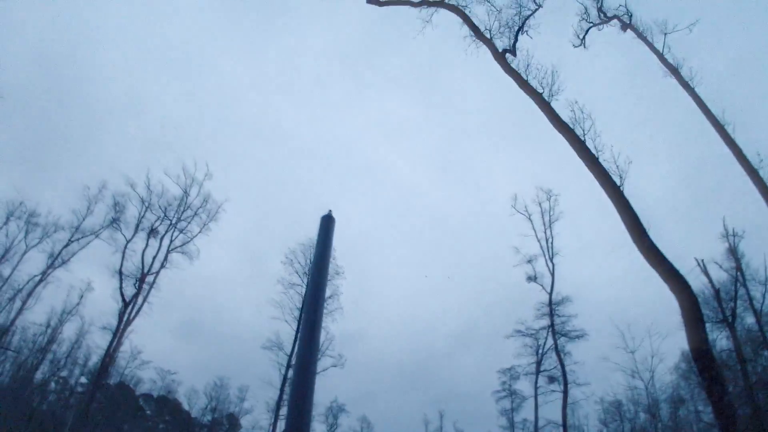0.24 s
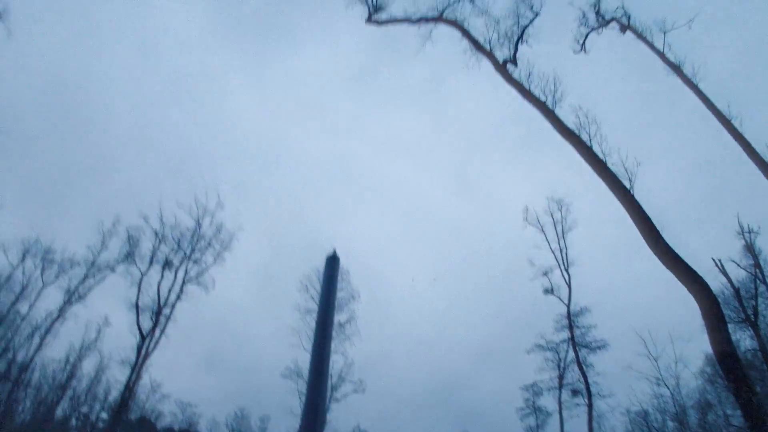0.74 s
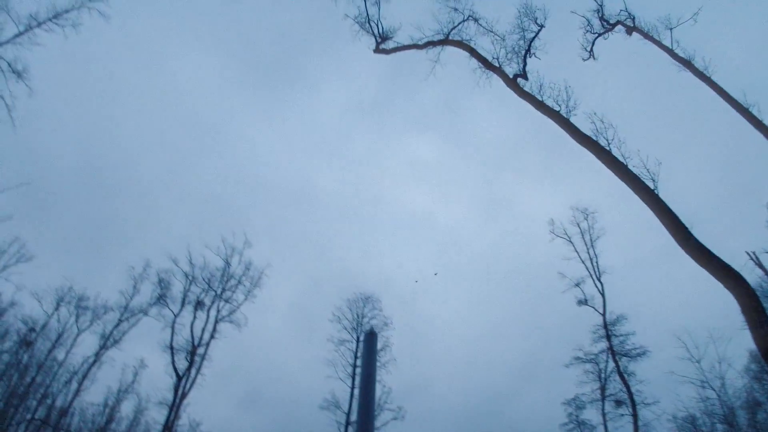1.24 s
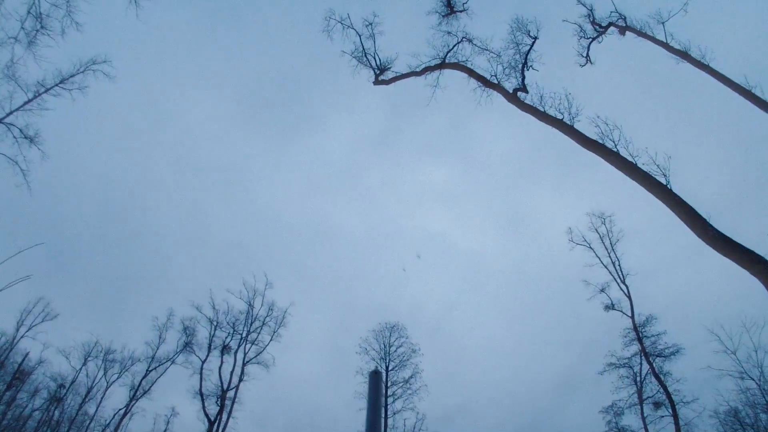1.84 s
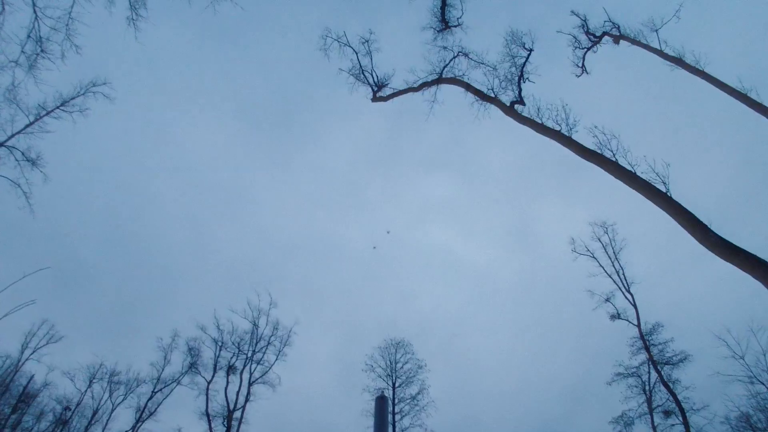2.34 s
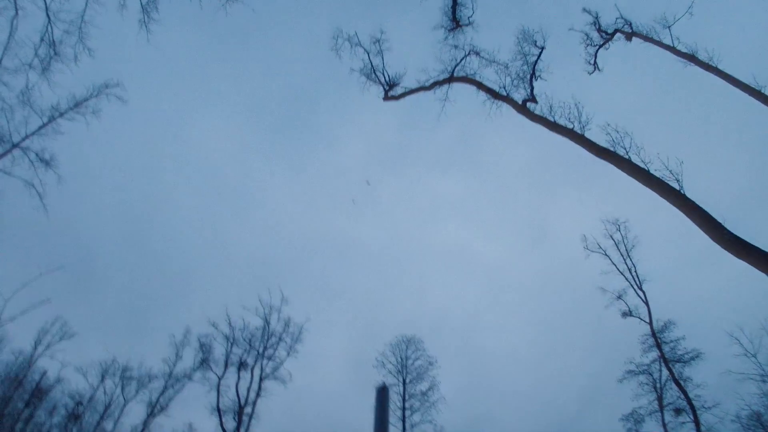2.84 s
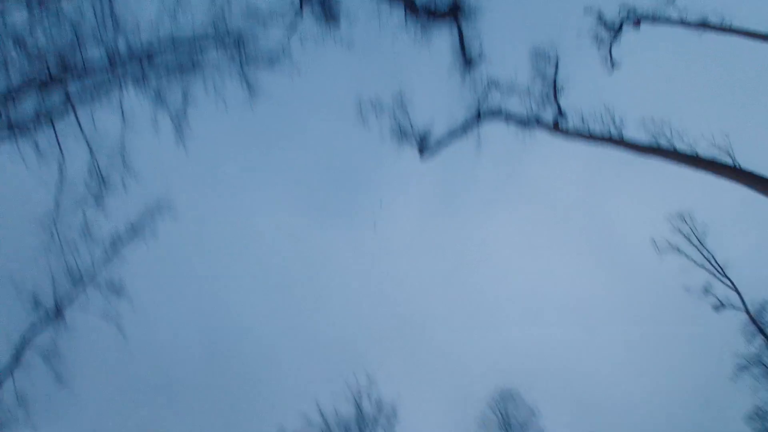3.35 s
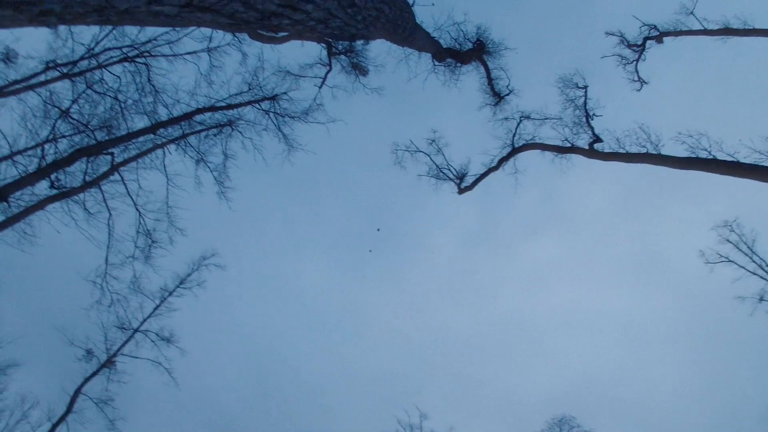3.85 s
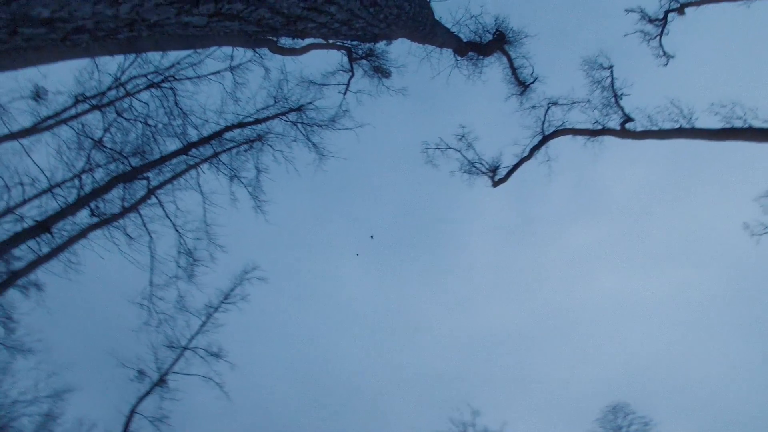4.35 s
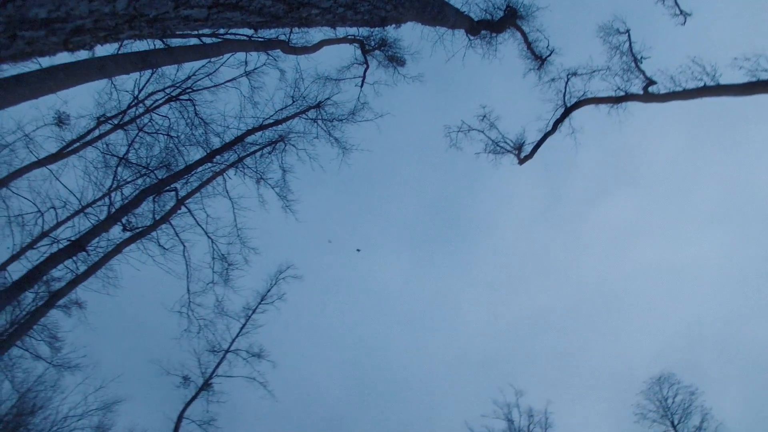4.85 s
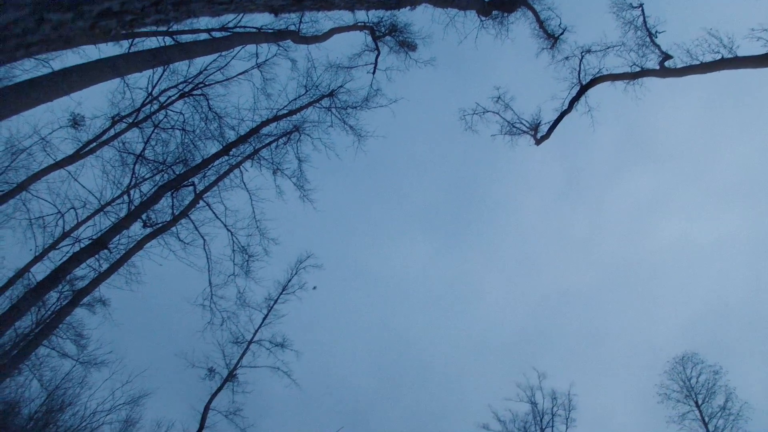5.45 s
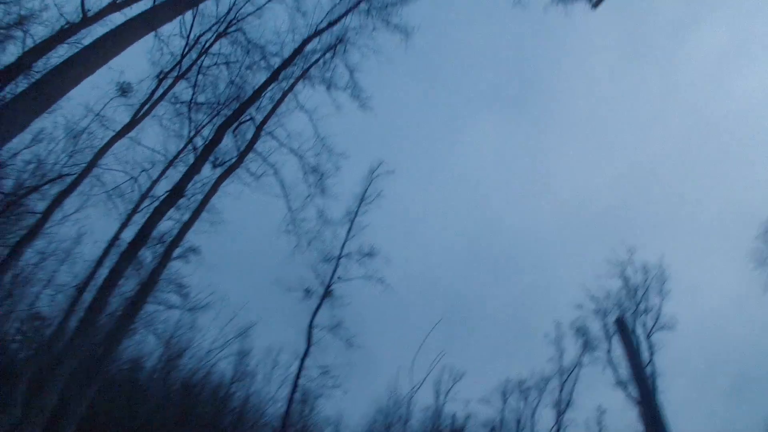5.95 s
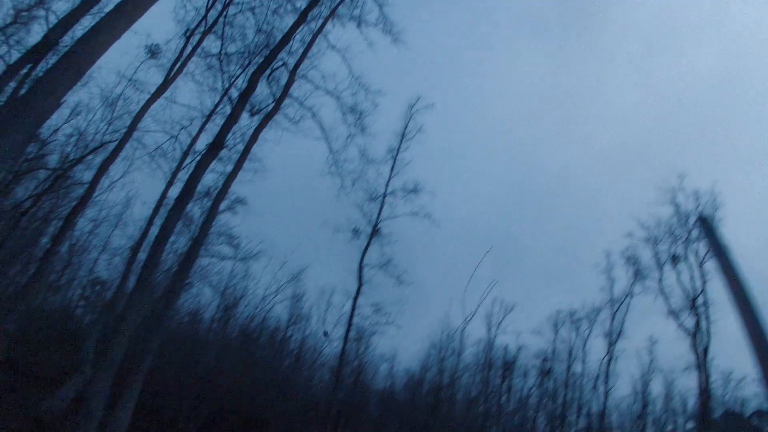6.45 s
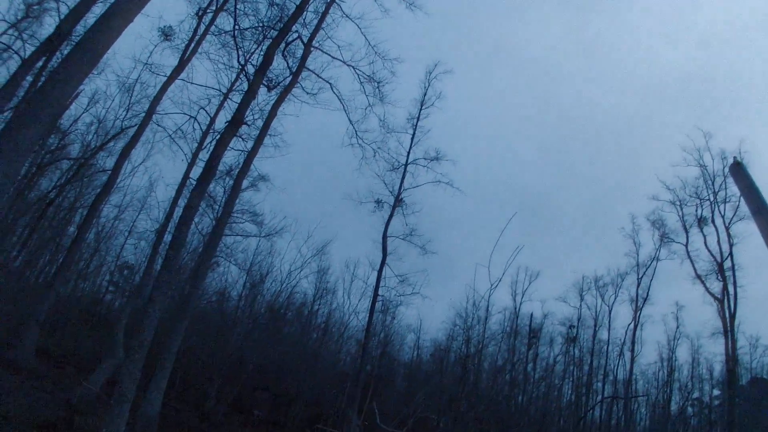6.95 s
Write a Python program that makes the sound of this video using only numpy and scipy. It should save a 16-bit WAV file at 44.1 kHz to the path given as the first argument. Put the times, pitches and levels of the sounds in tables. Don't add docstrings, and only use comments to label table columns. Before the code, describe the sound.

Low wind and distant traffic hum under tiny gun ticks and one high bird chip. Suddenly a very close gunshot clips the microphone, followed at once by dense woodland echoes, pulsing low booms and a darkening tail lasting a few seconds. A few hard little bits land. Finally come dull knocks on the wooden stock, sliding scrapes and two strong metal clacks as the action is worked, dry and near.

```python
import sys
import numpy as np
from scipy import signal
from scipy.fft import rfft, irfft, next_fast_len
from scipy.io import wavfile
from scipy.ndimage import uniform_filter1d, map_coordinates

SR = 44100
rng = np.random.default_rng(int(sys.argv[2]) if len(sys.argv) > 2 else 0)


def invert_db(x):
    u = np.asarray(x, float) / 20
    return 10 ** u


def digitize_waveform(pressure):
    field = np.atleast_2d(pressure).T
    bounded = np.clip(field, -1, 1)
    quanta = np.round(bounded * 32767).astype(np.int16)
    wavfile.write(sys.argv[1], SR, quanta)


N = 317520
SHOT_S = 2.8988


def unit(x):
    return x / np.sqrt(np.mean(x ** 2) + 1e-20)


def along(points, hz):
    f, v = np.transpose(points)
    return np.interp(np.log(hz + 1), np.log(f + 1), v)


def curves(rows, outside=None):
    s, *columns = np.transpose(rows)
    return [np.interp(np.arange(N) / SR, s, column, outside, outside) for column in columns]


def wobble(rate):
    knots = rng.standard_normal(int(N * rate / SR) + 4)
    return map_coordinates(knots, [np.arange(N) * rate / SR])


def filtered(x, response):
    m = next_fast_len(N + SR // 2)
    return irfft(rfft(x, m) * response(np.fft.rfftfreq(m, 1 / SR)), m)[..., :N]


def resonances(modes):
    def response(f):
        total = 0
        for k, (centre, width, db) in enumerate(modes):
            total = total + (-1) ** k * invert_db(db) * 1j * f * width / (centre * centre - f * f + 1j * f * width)
        return total
    return response


def rush(spectrum, source=None):
    noise = rng.standard_normal(N) if source is None else source
    return unit(filtered(noise, lambda hz: invert_db(along(spectrum, hz))))


def background():
    # (time [s], level [dB])
    wind = [(0, -37.5), (.55, -41), (1.2, -39.5), (2.35, -41), (2.85, -39.5), (5.3, -39.5), (6, -41.5),
            (6.35, -37.5), (6.75, -40.5), (7.2, -40)]
    # (frequency [Hz], level [dB per Hz])
    rumble = [(12, -37.5), (20, 3.5), (69, 1.5), (140, -5.5), (188, -11), (297, -18), (330, -42),
              (430, -50.5), (730, -120)]
    # (frequency [Hz], level [dB per Hz])
    traffic = [(190, -17), (330, -5), (404, -6), (511, -7), (580, -7), (848, -4.5), (1040, -11),
               (1500, -25), (1950, -55), (3300, -120)]
    # (frequency [Hz], level [dB per Hz])
    hiss_colour = [(760, -11), (1300, -10), (1670, 0.5), (1920, -1), (2250, -4), (2910, -1.5), (3430, -4),
                   (3880, -4.5), (4390, -5.5), (5510, -4.5), (7510, -8.5), (11200, -10.5), (15000, -9.5),
                   (15500, -38.5)]
    # (time [s], firing rate [Hz], 2nd order [dB], 3rd order [dB])
    engine_course = [(0, 88.9, -46, -53), (.6, 89.58, -48, -68.5), (1, 89.2, -51, -57), (1.5, 93, -48, -72),
                     (1.85, 94.1, -50, -55.5), (2.1, 98.1, -53, -52.5), (2.8, 97.64, -40.5, -53),
                     (5, 92.57, -47.5, -69.5), (5.6, 93.15, -43.5, -53.5), (6.2, 93.44, -55, -56),
                     (6.7, 95.6, -51.5, -49), (7.2, 97, -60, -51)]
    # (frequency [Hz], level [dB])
    whine_tones = [(13124, -93.5), (13157, -90.5), (13517, -89)]

    wind_db, = curves(wind)
    firing, second_db, third_db = curves(engine_course)
    turn = 2 * np.pi * np.cumsum(firing * (1 + .005 * wobble(5))) / SR
    engine = invert_db(second_db + 2.2 * wobble(6)) * np.sin(2 * turn)
    engine += invert_db(third_db + 2 * wobble(5)) * np.sin(3 * turn)
    low = invert_db(wind_db + 1.2659 + 1.2 * wobble(7.3)) * rush(rumble)
    road = invert_db(-50.5 + 0.31 * wobble(9.3)) * rush(traffic)
    whine = np.zeros(N)
    for hz, db in whine_tones:
        whine += invert_db(db + 2.0 + 2.5 * wobble(9.6)) * np.sin(2 * np.pi * hz * np.arange(N) / SR)
    hiss = invert_db(-60.5 + .4 * wobble(3.7)) * rush(hiss_colour)
    return low + road + engine + whine + hiss


def chatter(length, t):
    spikes = rng.standard_normal(len(t)) * invert_db(6 * rng.standard_normal(len(t)))
    spikes /= np.std(spikes[:round(length * SR)])
    spikes[0] = 8
    return spikes * invert_db(-5 * t / length - 60 * np.clip(t - length, 0, None) / 0.0103)


def handling():
    # (time [s], peak [dB], bolt over receiver [dB])
    ticks = [(0.456, -44, -5.5), (0.478, -49.5, 16), (0.5294, -52.5, -1.5), (1.3844, -52, -7.5),
             (2.025, -48, -9.5), (2.373, -51.5, 9), (5.162, -43.5, -2.5), (5.716, -46, 1.5),
             (5.737, -39.5, -3), (5.8631, -43, -3.5), (6.034, -40.5, 2), (6.186, -37, -3),
             (6.812, -33.5, -0.5), (6.9394, -36.5, -1), (6.9996, -29.5, 0), (7.0547, -47.5, 4.5)]
    # (time [s], peak [dB], bolt over receiver [dB], small parts [dB])
    action = [(6.3756, -33.5, 5, -22), (6.384, -34.5, -14.5, -18.5), (6.408, -39, -0.5, -12),
              (6.432, -40.5, -0.5, -5), (6.447, -38.5, -8.5, -3.5), (6.4572, -28.5, 4, -14),
              (6.461, -19.5, 0.5, -8.5), (6.481, -35.5, 9.5, 8.5), (6.521, -32.5, 8.5, -7.5),
              (6.535, -36.5, 5.5, -6), (6.554, -15.5, 3, -13), (6.617, -24.5, 7.5, -5.5),
              (6.624, -13, -1.5, -10.5), (6.6418, -17.5, 13.5, 6.5), (6.719, -28, -1, -13)]
    # (time [s], peak [dB], pitch [Hz], length [s])
    knocks = [(0.13, -41.5, 830, 0.0055), (5.826, -30, 648, 0.0166), (5.878, -33, 513, 0.0072),
              (5.997, -36.5, 509, 0.0101), (6.03, -35, 778, 0.0073), (6.39, -24.5, 787, 0.0088),
              (6.412, -30.5, 828, 0.0076), (6.44, -29.5, 294, 0.0103), (6.46, -14.5, 285, 0.00309),
              (6.52, -29.5, 611, 0.0048), (6.5553, -26.5, 899, 0.0053), (6.615, -23, 425, 0.0112),
              (6.624, -16.5, 767, 0.00386)]
    # (frequency [Hz], width [Hz], level [dB])
    body = [(1675, 266, 4.5), (2483, 480, -1)]
    # (frequency [Hz], width [Hz], level [dB])
    steel = [(3030, 740, 2), (4050, 150, 6), (5330, 896, 2.5), (6900, 220, -12)]
    # (frequency [Hz], width [Hz], level [dB])
    sizzle = [(7570, 11000, -1), (12150, 3900, 3)]
    # (time [s], level [dB])
    slides = [
        [(0.42, -70.5), (0.47, -59), (0.51, -63.5), (0.555, -65), (0.66, -69.5)],
        [(5.7, -73.5), (5.95, -64)],
        [(6.375, -45.5), (6.427, -46.5), (6.551, -50.5), (6.635, -43), (6.743, -48), (7.047, -58.5), (7.2, -62)],
    ]
    # (frequency [Hz], level [dB per Hz])
    scrape = [(150, -26.5), (250, -1), (600, -3.5), (900, -1.5), (1250, -8.5), (1750, -8), (2100, -16.5),
              (2850, -8.5), (3600, -13), (4600, -16.5), (5300, -11.5), (6100, -18.5), (12200, -34),
              (15800, -47)]

    metal = np.zeros((3, N + SR))
    wood = np.zeros(N + SR)
    t = np.arange(SR // 10) / SR
    tick_small_db, parts_db, contact_s = -7, -10.5, 0.00508
    for s, db, lean_db, small_db in [(*row, tick_small_db) for row in ticks] + action:
        share = invert_db(db + parts_db + np.array([-lean_db / 2, lean_db / 2, small_db]))
        metal[:, round(s * SR):][:, :len(t)] += share[:, None] * chatter(contact_s, t)

    for s, db, hz, length in knocks:
        shape = invert_db(-60 * np.clip(t - length, 0, None) / 0.011) * (1 - np.exp(-t / 0.00099))
        ring = np.sin(2 * np.pi * hz * t) * shape
        thud = signal.lfilter(*signal.butter(3, [280, 900], "band", fs=SR), chatter(length, t))
        wood[round(s * SR):][:len(t)] += invert_db(db - 5.5) * (ring + 3.0 * thud)

    def band(f, low_hz, high_hz):
        return 1 / (1 + (f / high_hz) ** 6) / (1 + (low_hz / (f + 1)) ** 6)

    def parts(f):
        return np.array([invert_db(11.5) * resonances(body)(f) * band(f, 990, 3090),
                         invert_db(5.5) * resonances(steel)(f) * band(f, 1770, 8750),
                         invert_db(-5.0) * resonances(sizzle)(f) * band(f, 5800, 15100)])

    near = filtered(metal[:, :N], parts).sum(axis=0) + wood[:N]
    slide = sum(invert_db(curves(rows, outside=-130)[0]) for rows in slides)
    grit = rng.standard_normal(N) * invert_db(2.6 * wobble(300) + .7 * wobble(40))
    t = np.arange(SR // 2) / SR
    tail = unit(rng.standard_normal(len(t)) * invert_db(-60 * t / .5)) / np.sqrt(len(t))
    echo = invert_db(-7.0) * signal.fftconvolve(near, tail)[:N]
    return near + echo + slide * invert_db(6.5) * rush(scrape, source=grit)


def bird():
    # (time [s], length [s], start pitch [Hz], end pitch [Hz], level [dB])
    chips = [
        (1.635, 0.0204, 5600, 7670, -44),
        (5.02, .03, 7300, 7700, -61.5),
        (5.311, 0.0366, 7370, 8000, -57),
    ]
    out = np.zeros(N)
    for s, length, low_hz, high_hz, db in chips:
        u = np.arange(round(length * SR)) / (length * SR)
        pitch = high_hz - (high_hz - low_hz) * np.exp(-3.5 * u)
        loudness = invert_db(db - 9.9 * u) * np.sin(np.pi * u) ** .5
        out[round(s * SR):][:len(u)] += loudness * np.sin(2 * np.pi * np.cumsum(pitch) / SR)
    t = np.arange(SR // 8) / SR
    tail = unit(rng.standard_normal(len(t)) * invert_db(-60 * t / 0.39)) / np.sqrt(len(t))
    return out + invert_db(-5.5) * signal.fftconvolve(out, tail)[:N]


def blast():
    # (delay after the shot [s], level [dB], length of the push [s])
    fronts = [
        (0, 27, .00122),
        (.0021, 26, .00085),
        (.0043, 12, .00025),
    ]
    t = np.arange(N) / SR - SHOT_S
    wave = np.zeros(N)
    for delay, db, phase in fronts:
        u = np.clip(t - delay, 0, None) / phase
        wave -= invert_db(db) * (t >= delay) * (1 - u) * np.exp(-1.15 * u)
    wave *= invert_db(-60 * np.clip(t - .0042, 0, None) / .004)
    pressure = filtered(wave, lambda f: 1 / (1 + 1j * f / 8000))

    lead = np.clip(1 + t / .0022, 0, 1) ** 2
    swell = np.where(t < .0045, lead, invert_db(-60 * (t - .0045) / .02))
    swell *= np.where(t > .004, 2, 1)
    mount = resonances([(4800, 1200, 0), (2800, 1200, -5)])
    rattle = invert_db(-7) * swell * unit(filtered(rng.standard_normal(N), lambda f: mount(f) ** 2))
    early_push = .7 * lead ** 2 * (t < 0)
    recovery = invert_db(-11) * np.sin(np.pi * np.clip((t - .0055) / .011, 0, 1))
    return pressure + rattle - early_push - recovery


def hump(t, start_db, swell, peak_s, fade):
    return invert_db(2 * (start_db + swell * np.minimum(t, peak_s) - fade * np.clip(t - peak_s, 0, None)))


def woods():
    # (frequency [Hz], level [dB per Hz])
    trunk_colour = [(190, -21), (330, -8), (620, -4.5), (930, -4), (1380, -14), (1720, -8.5), (2020, -19),
                    (2800, -14), (3500, -17.5), (4680, -24), (5250, -19.5), (5950, -29.5), (13000, -51),
                    (15800, -66.5)]
    # (frequency [Hz], extra loss [dB per s of path])
    air_loss = [(500, -4.5), (1500, -3), (3000, 6), (5000, 19.5), (8000, 44), (12000, 78.5), (16000, 117.5)]
    # (frequency [Hz], level [dB per Hz])
    slopes = [(190, -17), (360, 1.5), (520, 2), (850, 0), (1350, -14.5), (1700, -13.5), (2300, -27),
              (4000, -120)]
    # (frequency [Hz], level [dB per Hz])
    near_boom = [(35, -45), (60, -17.5), (100, -8), (150, -1), (200, -1.5), (256, -2), (320, -7.5),
                 (420, -22), (550, -41.5), (920, -120)]
    # (frequency [Hz], level [dB per Hz])
    far_boom = [(44, -35.5), (75, -7.5), (108, 1.5), (162, -2), (236, -5), (420, -23), (550, -41.5),
                (920, -120)]
    # (time [s], level [dB], half width [s])
    surge_rows = [
        (2.905, -18, .008),
        (3.18, -11.5, 0.0098),
        (3.255, -11.5, 0.0282),
        (3.356, -6.5, 0.0128),
        (3.43, -15.5, .015),
        (3.48, -13, 0.0122),
        (3.67, -18.5, 0.0217),
    ]
    frame = 512
    s = np.arange(N) / SR
    since = np.clip(s - SHOT_S, 0, None)

    scatter = rng.standard_normal(N) * invert_db(1.0 * wobble(300))
    hz, t, z = signal.stft(scatter, SR, nperseg=frame)
    late = np.clip(t - SHOT_S, 0, None) - 0.1997
    path = 0.967 * late / (1 + .08 * late)
    patches = uniform_filter1d(rng.standard_normal(z.shape), size=5, axis=0)
    patches = unit(uniform_filter1d(patches, size=8, axis=1))
    gain_db = 1 * patches - along(air_loss, hz)[:, None] * path
    dulled = signal.istft(z * invert_db(gain_db), SR, nperseg=frame)[1][:N]
    coloured = filtered(dulled, lambda f: invert_db(along(trunk_colour, f)))
    middle = slice(round(3.0 * SR), round(3.2 * SR))

    near = invert_db(2 * (-9 - 60 * since / 0.34))
    wood = hump(since, -15, 6, 0.4176, 24)
    trunks = np.sqrt(near + wood) * coloured / np.std(coloured[middle])
    far_slopes = invert_db(-35 - 5 * since + 1.5 * wobble(7))
    bank = invert_db(-11.5 - 60 * since / 0.38)
    ground = (far_slopes + bank) * rush(slopes)

    line = hump(since, -21.5, 20, 0.3794, 17)
    line += invert_db(2 * (-27.5 - 8 * since))
    surges = sum(invert_db(2 * db) * np.exp(-((s - at) / width) ** 2) for at, db, width in surge_rows)
    far = np.clip((s - 3.45) / 0.91, 0, 1)
    boom = np.sqrt(1 - far) * rush(near_boom) + np.sqrt(far) * rush(far_boom)
    heard = np.clip((since - .004) / .004, 0, 1)
    return heard * (trunks + ground + np.sqrt(line + surges) * boom)


def falls():
    # (time [s], peak [dB], pitch [Hz])
    landings = [
        (3.968, -37, 4500),
        (4.548, -52, 4600),
        (4.59, -37, 4500),
        (5.016, -45, 3700),
    ]
    length, width = .0035, .5
    out = np.zeros(N + SR)
    t = np.arange(SR // 10) / SR
    for s, db, hz in landings:
        edges = hz * np.array([1 - width / 2, 1 + width / 2])
        patter = signal.lfilter(*signal.butter(3, edges, "band", fs=SR), chatter(length, t))
        out[round(s * SR):][:len(t)] += invert_db(db + 4.5) * patter
    return out[:N]


def scene():
    return (background() + handling() + bird() + blast() + woods() + falls())[None]


def top_cut(x):
    return signal.sosfilt(signal.butter(12, 15700, fs=SR, output="sos"), x)


def record(dry):
    clipped = np.clip(dry, -1, 1)
    rolled_off = filtered(clipped, lambda f: 1 / (1 + (f / 15800) ** 12))
    mix = np.clip(rolled_off, -1, 1)
    return top_cut(mix)


dry = scene()
out = record(dry)
digitize_waveform(out)
```